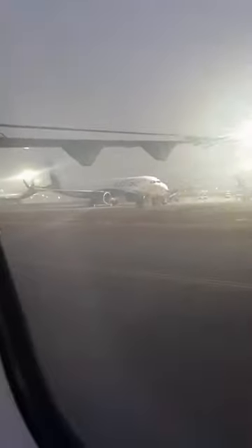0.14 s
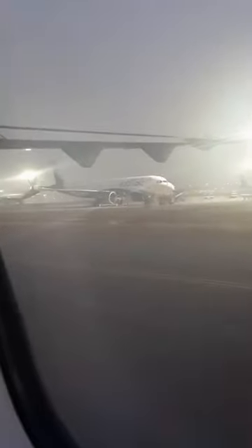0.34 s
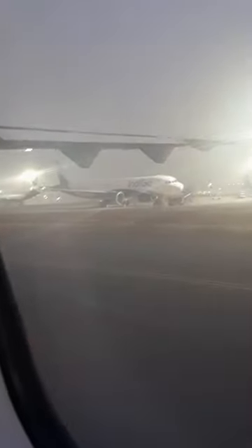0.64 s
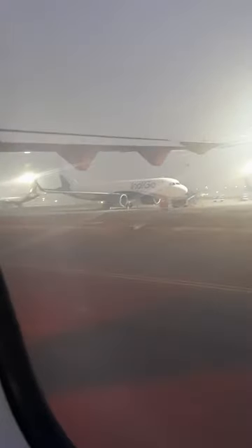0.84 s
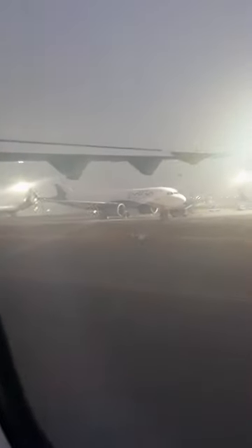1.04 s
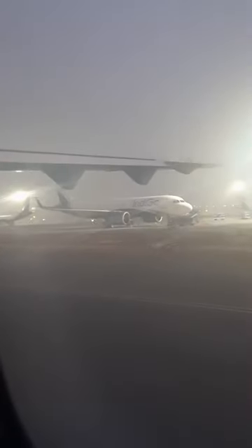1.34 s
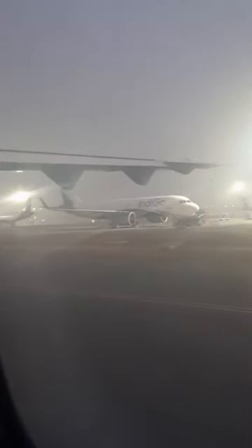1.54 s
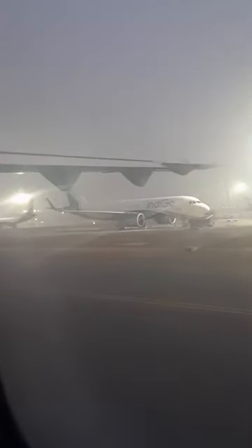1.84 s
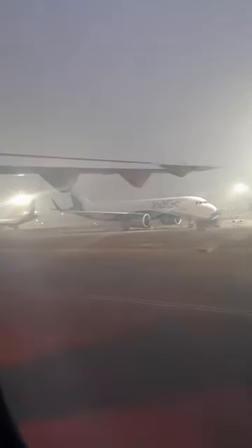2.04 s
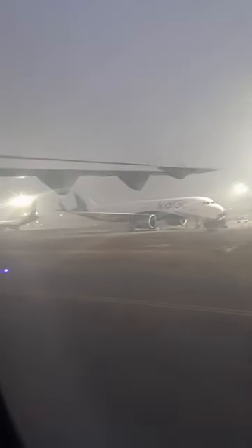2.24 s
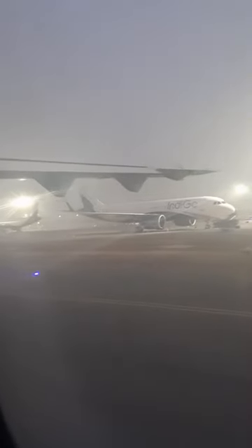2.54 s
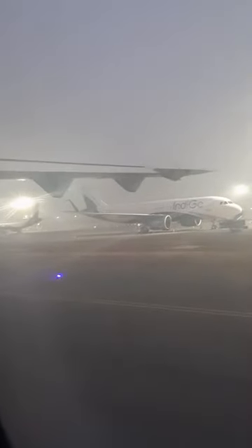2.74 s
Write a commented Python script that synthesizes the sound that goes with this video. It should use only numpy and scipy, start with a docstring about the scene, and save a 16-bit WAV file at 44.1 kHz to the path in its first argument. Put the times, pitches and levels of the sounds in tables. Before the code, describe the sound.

Jet engines rumble and hum steadily, heard from inside a taxiing airliner's cabin.

```python
"""Inside an airliner cabin while it taxis. From the start, wheels and engines make the fuselage rumble
and boom, the engines hum on wavering multiples of their shaft speed, and cabin air hisses under thin
turbomachinery whines. Early on the trim creaks, cloth rustles twice and one whine flares three times.
Midway the hum swells. Near the end come three more soft rustles, then a creak and a last flare."""
import sys
import numpy as np
from scipy import signal
from scipy.fft import rfft, irfft
from scipy.io import wavfile
from scipy.ndimage import uniform_filter1d

SR = 44100
rng = np.random.default_rng(int(sys.argv[2]) if len(sys.argv) > 2 else 0)


def put_to_file(sound):
    """Save the sound as 16-bit audio at rate SR, in the file named by the first command-line argument."""
    columns = np.atleast_2d(sound).T  # one column per channel
    safe = np.clip(columns, -1, 1)
    whole_steps = np.round(safe * 32767)
    wavfile.write(sys.argv[1], SR, whole_steps.astype(np.int16))


N = 127890
TIME = np.arange(N) / SR
FREQS = np.maximum(np.arange(N // 2 + 1) * SR / N, 1)
SIDES = np.array([[1], [-1]])   # left, right


def from_db(db):
    """Decibels to gain."""
    return 10 ** (np.asarray(db) / 20)


def rms_one(x):
    """Scale to an rms of 1."""
    return x / np.sqrt(np.mean(np.abs(x) ** 2) + 1e-20)


def over_time(points):
    """An automation curve of (time_s, value), at every sample."""
    return np.interp(TIME, *np.transpose(points))


def over_hz(points):
    """A curve of (freq_hz, value), at every frequency."""
    hz, value = np.transpose(points)
    return np.interp(np.log(FREQS), np.log(hz), value)


def pan(db):
    """Left and right gains for a level difference; positive leans left."""
    gains = from_db(SIDES * db / 2)
    return gains / np.sqrt(np.mean(gains ** 2, axis=0))


def drift(rate_hz):
    """Smooth random movement with an rms of 1."""
    return rms_one(irfft(rfft(rng.standard_normal(N)) / (1 + (FREQS / rate_hz) ** 2), N))


def waver(roughness, rate_hz):
    """A steady part plus a part that wanders in strength and phase."""
    wander = rms_one(drift(rate_hz) + 1j * drift(rate_hz))
    return np.sqrt(1 - roughness ** 2) + roughness * wander


def swell(peak_s, length_s):
    """A bell-shaped fade in and out."""
    return np.exp(-2 * ((TIME - peak_s) / length_s) ** 2)


def resonance(hz, width_hz):
    """Stereo noise ringing in one resonant band."""
    band = 1 / (1 + ((FREQS - hz) / (0.55 * width_hz)) ** 2)
    return rms_one(irfft(rfft(rng.standard_normal((2, N))) * band, N))


# Stereo image of the cabin, near mono in the lows and wide on top: freq_hz, correlation
EAR_LIKENESS = [(60, .99), (170, 0.93), (260, .84), (440, .85), (660, .6), (770, 0.16), (850, 0.41),
                (930, -0.39), (1400, -0.17), (2400, 0.016), (15000, 0.037)]
# Which way each band leans: freq_hz, pan_db
EAR_BALANCE = [(60, -1.5), (200, -1.5), (380, 1.5), (720, 4.5), (1250, 0), (2700, -4.5), (5400, -3),
               (7000, 1)]
def cabin_noise(spectrum):
    """Stereo noise of a given colour, as diffuse and lopsided as the cabin makes it."""
    mid, side = np.exp(2j * np.pi * rng.random((2, len(FREQS))))
    alike = over_hz(EAR_LIKENESS)
    ears = np.sqrt(1 + alike) * mid + np.sqrt(1 - alike) * side * SIDES
    return rms_one(irfft(ears * from_db(over_hz(spectrum)) * pan(over_hz(EAR_BALANCE)), N))


# Thin tones of the turbomachinery: pitch_hz, level_db
WHINE_TONES = [(3468, -76), (3646, -72), (3742, -73), (3923, -76), (4160, -76), (4578, -75), (6103, -75),
               (7629, -80), (14223, -81)]
def whines():
    """Turbomachinery tones fade in and out differently at each ear; one flares four times."""
    flaring_hz, flare_db = 4578, 10
    flares = sum(swell(peak_s, length_s=0.08) for peak_s in (0.52, 0.69, 1.07, 2.65))
    out = 0
    for hz, db in WHINE_TONES:
        ears = np.array([waver(roughness=0.53, rate_hz=1.9) for _ in range(2)])
        tone = rms_one((ears * np.exp(2j * np.pi * hz * TIME)).real)
        out += from_db(db + flare_db * flares * (hz == flaring_hz)) * tone
    return out


# Soft brushes of cloth: peak_s, length_s, level_db
RUSTLE_CUES = [(0.459, .08, -54.5), (0.738, .1, -61), (2.283, 0.017, -54), (2.42, 0.069, -54),
               (2.528, 0.039, -56)]
# Their bright colour: freq_hz, relative_db
RUSTLE_EQ = [(1500, -2.5), (4300, 3.5), (7500, -3), (8800, -16), (11500, -3), (15000, -6.5)]
def rustles():
    """Cloth brushes in faint, short swells of noise."""
    envelope = sum(from_db(db) * swell(peak_s, length_s) for peak_s, length_s, db in RUSTLE_CUES)
    return cabin_noise(RUSTLE_EQ) * envelope


# Small creaks of the trim: peak_s, length_s, pitch_hz, level_db
CREAK_CUES = [(0.374, .025, 2820, -54), (2.645, 0.0236, 2650, -50)]
def creaks():
    """The trim creaks on the right, each time a blip of resonant noise."""
    return pan(-7) * sum(from_db(db) * swell(peak_s, length_s) * resonance(hz, width_hz=550)
                         for peak_s, length_s, hz, db in CREAK_CUES)


# Colour of the ventilation hiss: freq_hz, relative_db
AIR_EQ = [(500, -12), (1000, -5), (1300, 3), (2500, -1.5), (2900, -6.5), (4400, -8.5), (5500, -14),
          (7800, -17.5), (8600, -37.5), (11500, -23), (14500, -21.5), (15700, -30.5)]
# Ringing of the air ducts: pitch_hz, width_hz, level_db, pan_db
DUCT_RINGS = [(1514, 45, -62, -7), (2031, 71, -56, -7.5), (2175, 150, -60, -9), (2560, 83, -65.5, -4.5)]
# Fader ride on that ringing: time_s, gain_db
DUCT_RIDE = [(0.1, 1.5), (0.25, -1), (0.48, 3.5), (0.85, -3.5), (1.05, 4), (1.13, -1.5), (1.87, -1.5),
             (2.0, 1), (2.26, -1), (2.43, 4.5), (2.55, 2)]
def cabin_air():
    """The ventilation hisses, and the ringing of its ducts comes and goes."""
    hiss_db, flutter_db = -47.5, 0.5
    hiss = from_db(hiss_db + flutter_db * drift(rate_hz=21)) * cabin_noise(AIR_EQ)
    ringing = sum(from_db(db) * pan(pan_db) * resonance(hz, width_hz)
                  for hz, width_hz, db, pan_db in DUCT_RINGS)
    return hiss + ringing * from_db(over_time(DUCT_RIDE))


# Partials of the engine hum: shaft_multiple, level_db, roughness, pan_db, ear_phase_rad
HUM_PARTIALS = [(3, -32, 0.67, 1, 0), (4, -27.5, 0.38, 2.5, 0.02), (5, -31.5, 0.31, 1.5, 0.05),
                (6, -37, 0.5, 4, -0.76), (7, -41.5, .7, -7, -1.7), (8, -47.5, 0.7, -5, -1.1),
                (9, -49.5, .8, -5, -0.5), (10, -51.5, 0.9, 1, 0.8), (11, -55, 0.8, 6, 3.5)]
# Swells of the fourth, fifth and sixth multiples: time_s, relative_db
FOURTH_RIDE = [(0.05, -28.5), (0.17, -25.5), (0.23, -38), (0.52, -30), (0.74, -34), (0.82, -22),
               (0.93, -32), (1.1, -26), (1.21, -41), (1.27, -25.5), (1.32, -37), (1.43, -19), (1.5, -26),
               (1.72, -26.5), (1.86, -19.5), (2.01, -29), (2.24, -24.5), (2.29, -41), (2.34, -24),
               (2.5, -28), (2.76, -25), (2.87, -39)]
FIFTH_RIDE = [(0.04, -24), (0.4, -39.5), (0.47, -32.5), (0.74, -39), (0.83, -25), (0.93, -27.5), (1.1, -38),
              (1.3, -39), (1.39, -26), (1.57, -44.5), (1.9, -35), (1.97, -23), (2.22, -35.5), (2.27, -26),
              (2.48, -42), (2.57, -29.5), (2.87, -32.5)]
SIXTH_RIDE = [(0.05, -47), (0.14, -33), (0.3, -44), (0.36, -30), (0.55, -48.5), (0.64, -31), (0.77, -42.5),
              (0.94, -27), (1.11, -43.5), (1.33, -31), (1.6, -44), (1.9, -34.5), (1.98, -32), (2.04, -39.5),
              (2.85, -39.5)]
def engine_hum():
    """Multiples of the shaft speed, each wavering on its way into the cabin amid turbulent noise."""
    shaft_hz, shaft_wander = 83.55, 0.00407
    skirt_db, skirt_hz, skirt_spread = -6.5, 17.35, 0.75   # the noise around each partial
    rides, ride_depth = {4: FOURTH_RIDE, 5: FIFTH_RIDE, 6: SIXTH_RIDE}, 0.99
    turns = np.cumsum(shaft_hz * (1 + shaft_wander * drift(rate_hz=3))) / SR
    out = 0
    for multiple, db, roughness, pan_db, ear_phase in HUM_PARTIALS:
        strength = waver(roughness, rate_hz=9)
        if multiple in rides:
            strength = rms_one(strength * from_db(ride_depth * over_time(rides[multiple])))
        skirt = waver(1, skirt_hz) + skirt_spread * SIDES * waver(1, skirt_hz)
        angle = 2 * np.pi * (multiple * turns + rng.random()) + SIDES * ear_phase / 2
        partial = (strength + from_db(skirt_db) * skirt) * np.exp(1j * angle)
        out += from_db(db) * pan(pan_db) * rms_one(partial.real)
    return out


# Bass-heavy colour of the fuselage: freq_hz, relative_db
RUMBLE_EQ = [(30, -43.5), (44, -14), (54, -13.5), (63, 2.5), (76, -2), (92, -8), (110, -1), (138, -6),
             (150, -7.5), (168, -8), (190, -17), (220, -15.5), (270, -15), (295, -22.5), (365, -23.5),
             (400, -18), (450, -31.5), (475, -20), (525, -32), (700, -31.5), (745, -26.5), (870, -35),
             (1100, -42), (1600, -70.5)]
# Surges of the rolling wheels, played at reduced depth: time_s, relative_db
WHEEL_RIDE = [(0.05, -23), (0.12, -32.5), (0.21, -12), (0.31, -26), (0.39, -20), (0.48, -32.5), (0.51, -21),
              (0.66, -25), (0.84, -32), (0.89, -21), (0.98, -20.5), (1.08, -29), (1.16, -25.5), (1.22, -18),
              (1.46, -24), (1.52, -16), (1.57, -26), (2.0, -23), (2.07, -24.5), (2.12, -17), (2.25, -33.5),
              (2.3, -17), (2.35, -32), (2.47, -29), (2.51, -13.5), (2.59, -30.5), (2.63, -24.5),
              (2.85, -24.5)]
def fuselage_rumble():
    """The fuselage shakes; its deepest band swells with the wheels, the band above with the boom."""
    level_db, flutter_db = -18.5, 1.0
    crossovers_hz, wheel_depth, boom_depth = (95, 160), 0.75, 0.25
    noise = cabin_noise(RUMBLE_EQ)
    deep, low = (irfft(rfft(noise) / (1 + (FREQS / hz) ** 10), N) for hz in crossovers_hz)
    # Compress the deep band's random swells over 50 ms so that the wheels lead.
    power = uniform_filter1d(np.mean(deep ** 2, axis=0), int(0.05 * SR))
    compression = (power / power.mean()) ** -0.35
    wheel_db, boom_db = over_time(WHEEL_RIDE), over_time(BOOM_RIDE)
    rolling = deep * compression * from_db(wheel_depth * (wheel_db - wheel_db.mean()))
    booming = (low - deep) * from_db(boom_depth * (boom_db - boom_db.mean()))
    fluttering = (noise - low) * from_db(flutter_db * drift(rate_hz=18))
    return from_db(level_db) * (rolling + booming + fluttering)


# Slides of the cabin boom: time_s, pitch_hz
BOOM_GLIDE = [(0.6, 128.4), (0.81, 123.5), (0.93, 129.2), (1.7, 128.3), (1.84, 122.8), (1.97, 126.7),
              (2.18, 118.6), (2.3, 127.3), (2.85, 129.3)]
# Its throb, which also stirs the rumble: time_s, relative_db
BOOM_RIDE = [(0.05, -11), (0.15, -16.5), (0.21, -23), (0.27, -14.5), (0.48, -21.5), (0.52, -9.5),
             (0.59, -23), (0.64, -17.5), (0.73, -21), (0.79, -14.5), (0.89, -24.5), (0.95, -14),
             (1.01, -17.5), (1.07, -30), (1.15, -13.5), (1.2, -24.5), (1.33, -13.5), (1.43, -22.5),
             (1.52, -10.5), (1.65, -13), (1.71, -16), (1.82, -11), (1.86, -23.5), (1.95, -10.5),
             (2.01, -15), (2.05, -22), (2.17, -28), (2.22, -12.5), (2.28, -21), (2.43, -11), (2.51, -13),
             (2.54, -23), (2.6, -9), (2.68, -13), (2.77, -8.5), (2.81, -16.5), (2.87, -13)]
def cabin_boom():
    """One low cabin resonance drones, sliding and throbbing."""
    trim_db = -1.7
    cycles = np.cumsum(over_time(BOOM_GLIDE)) / SR
    tone = waver(roughness=0.18, rate_hz=4.5) * np.exp(2j * np.pi * cycles)
    return np.sqrt(2) * tone.real * from_db(over_time(BOOM_RIDE) + trim_db) * pan(-1.15)


def scene():
    """The full mix, heard from a window seat."""
    return fuselage_rumble() + cabin_boom() + engine_hum() + cabin_air() + whines() + rustles() + creaks()


def record(dry):
    """A steep low-pass takes off the very top."""
    cutoff_hz = 15750
    return signal.sosfilt(signal.ellip(12, 0.1, 80, cutoff_hz, fs=SR, output="sos"), dry)


dry = scene()
out = record(dry)
put_to_file(out)
```